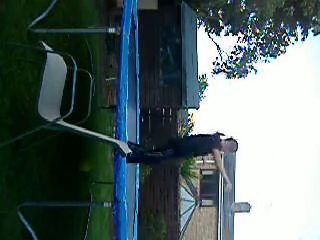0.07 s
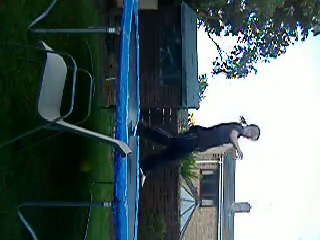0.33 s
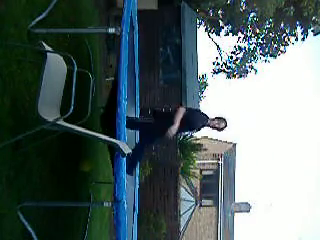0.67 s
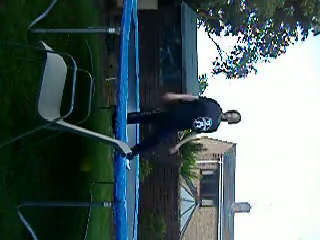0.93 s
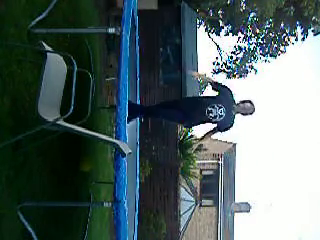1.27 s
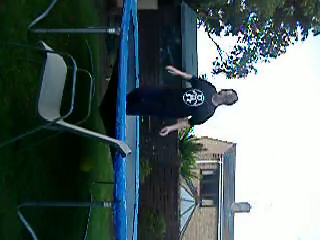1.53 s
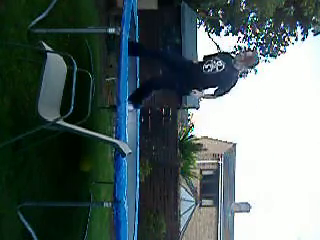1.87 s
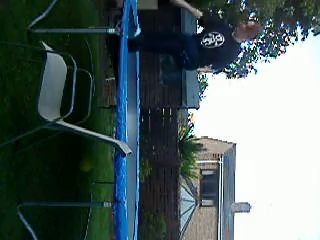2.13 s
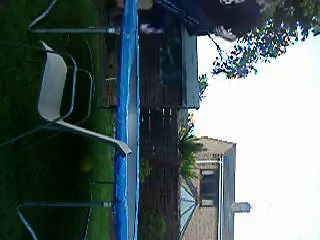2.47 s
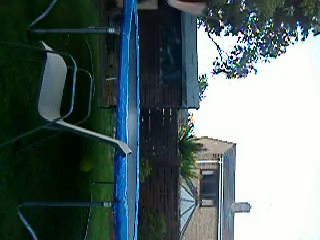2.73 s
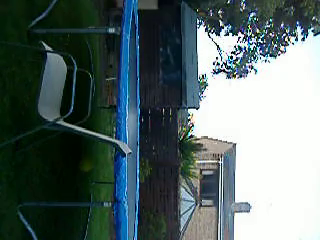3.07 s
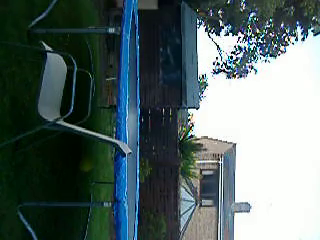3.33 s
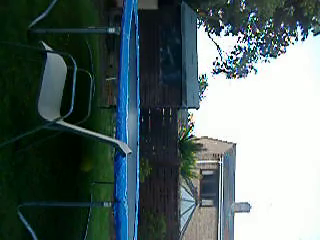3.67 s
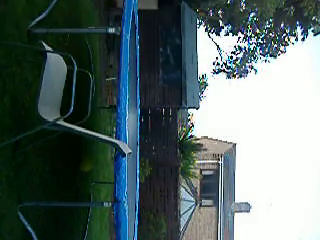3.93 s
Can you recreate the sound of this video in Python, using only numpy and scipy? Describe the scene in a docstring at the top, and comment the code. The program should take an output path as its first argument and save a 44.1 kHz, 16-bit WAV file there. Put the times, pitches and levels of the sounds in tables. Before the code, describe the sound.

Trampoline springs rasp and creak through about six bounces, roughly two a second, with brief metallic squeals. At about 2.7 seconds a foot knocks on the rim, and dull thuds with a light grass swish follow until 3 seconds. One more soft step lands near 3.8 seconds. Faint outdoor rumble, microphone hiss and a thin high whine continue underneath throughout.

```python
"""Someone bounces on a garden trampoline, whose spring hooks rasp on the frame by stick-slip friction.
The slips come faster under load and drive the resonant modes of the steel; at times a spring squeals.
A foot knocks and thuds on the rim, then the jumper drops to the ground and moves off with dull thuds,
each impact exciting damped vibrations. Behind it are an outdoor rumble, a faint hollow tone and hum,
and the hiss and whine of a small camera."""
import sys
import numpy as np
from scipy import signal
from scipy.fft import rfft, irfft
from scipy.io import wavfile
from scipy.ndimage import uniform_filter1d

SR = 44100
rng = np.random.default_rng(int(sys.argv[2]) if len(sys.argv) > 2 else 0)


def dump_mix(stems):
    """Bounce the given channels to the path in sys.argv[1] as a 16-bit WAV at rate SR."""
    frames = np.atleast_2d(stems).T  # one column per channel
    limited = np.clip(frames, -1, 1)  # hard clip at full scale
    pcm = np.round(limited * 32767).astype(np.int16)
    wavfile.write(sys.argv[1], SR, pcm)


N = 176400
T = np.arange(N) / SR
CUTOFF_HZ = 9300


def from_db(db):
    """Amplitude ratio: a factor of ten for every 20 dB."""
    return 10 ** (np.asarray(db) / 20)


def rms_one(x):
    """Normalisation to unit root-mean-square amplitude."""
    return x / np.sqrt(np.mean(x ** 2) + 1e-20)


def drift(corner_hz):
    """Random fluctuation: low-passed noise of unit rms, computed at every 40th sample."""
    pole = np.exp(-80 * np.pi * corner_hz / SR)
    slow = signal.lfilter([1], [1, -2 * pole, pole * pole], rng.standard_normal(N // 40 + 2002))[2000:]
    return np.interp(np.arange(N) / 40, np.arange(len(slow)), rms_one(slow))


def colour(x, points):
    """Spectral shaping by (frequency_hz, gain_db) points, falling 12 dB per octave below the first."""
    hz, db = np.transpose(points)
    bins_hz = np.maximum(np.fft.rfftfreq(2 * N, 1 / SR), 1)
    rolloff_db = 40 * np.log10(np.minimum(bins_hz / hz[0], 1))
    gain = from_db(np.interp(np.log(bins_hz), np.log(hz), db) + rolloff_db)
    return irfft(rfft(x, 2 * N) * gain * (bins_hz < CUTOFF_HZ))[:N]


def resonator(x, hz, t60_s):
    """Damped harmonic oscillator: a unit impulse starts a decaying sine of amplitude 1."""
    decay, step = from_db(-60 / (t60_s * SR)), 2 * np.pi * hz / SR
    return signal.lfilter([0, np.sin(step)], [1, -2 * decay * np.cos(step), decay * decay], x + 1e-18)


def reverberate(x, t60_s):
    """Diffuse decay: convolution with exponentially dying noise of unit energy."""
    echoes = rng.standard_normal(N) * np.exp(-np.log(1000) * T / t60_s)
    return signal.fftconvolve(x, echoes / np.linalg.norm(echoes))[:N]


def impulses(starts_s, sizes):
    """Ideal impacts, each one sample long."""
    return np.bincount((np.asarray(starts_s) * SR).astype(int), sizes, N)[:N]


def narrowband_swells(rows):
    """Narrowband noise: random amplitude and phase roughen each tone as it swells and fades."""
    out = 0
    for start_s, length_s, pitch_hz, level_db, width_hz in rows:
        swell = np.sqrt(np.abs(np.sin(np.pi * np.clip((T - start_s) / length_s, 0, 1))))
        phasor = drift(width_hz / 2) + 1j * drift(width_hz / 2)
        phasor /= np.sqrt(uniform_filter1d(np.abs(phasor) ** 2, size=2000) + 1e-6)
        tone = np.sqrt(2) * np.real(phasor * np.exp(2j * np.pi * pitch_hz * T))
        out += from_db(level_db) * swell * tone
    return out


# Spectrum of the rumble and hiss: frequency_hz, gain_db
AMBIENT_SPECTRUM = [(20, 5.5), (40, 1.5), (80, -0.5), (125, -4), (200, -8.5), (270, -9.5), (390, -11.5),
                    (580, -11.5), (760, -12), (920, -9), (1120, -18.5), (1400, -20), (2000, -22.5),
                    (5400, -24.5), (7500, -22.5), (8400, -29.5)]
def rumble_and_hiss():
    """Broadband noise: outdoor rumble wavers by amplitude modulation under steady camera hiss."""
    noise = from_db(-45.5) * rms_one(colour(rng.standard_normal(N), AMBIENT_SPECTRUM))
    rumble = signal.sosfiltfilt(signal.butter(2, 900, fs=SR, output="sos"), noise)
    hiss = noise - rumble
    return hiss + rumble * from_db(drift(4.1))


# Thin tones of the camera: pitch_hz, level_db
WHINE_TONES = [(7354, -65), (7887, -66), (8113, -69)]
def camera_whine(wander_hz=8):
    """Random frequency modulation makes each high sine waver slightly."""
    out = 0
    for pitch_hz, level_db in WHINE_TONES:
        phase = 2 * np.pi * np.cumsum(pitch_hz + wander_hz * drift(25)) / SR
        out += from_db(level_db) * np.sqrt(2) * np.sin(phase)
    return out


# Hollow tone and low hum: start_s, length_s, pitch_hz, level_db, width_hz
HOLLOW_SWELLS = [(1.06, 0.12, 538, -53, 13), (1.33, 0.14, 550, -57, 20), (1.6, 0.34, 521, -54.5, 25)]
HUM_SWELLS = [(3.58, 0.49, 235, -54.5, 26)]
def hollow_tone_and_hum():
    """Noise in a narrow band is heard as a pitch: a hollow tone comes and goes, a hum swells once."""
    return narrowband_swells(HOLLOW_SWELLS) + narrowband_swells(HUM_SWELLS)


# Strokes of a sole over the grass: start_s, length_s, level_db
SOLE_STROKES = [(2.835, .035, -46), (2.885, .05, -48), (3.781, .016, -42)]
# Spectrum of the swish: frequency_hz, gain_db
GRASS_SPECTRUM = [(250, 5.5), (850, -1), (1300, -13.5), (2300, -10), (3500, -22), (8000, -30)]
def grass_swishes():
    """Sliding friction of a sole makes short, dry swells of noise."""
    envelope = sum(from_db(level_db) * np.sin(np.pi * np.clip((T - start_s) / length_s, 0, 1))
                   for start_s, length_s, level_db in SOLE_STROKES)
    return envelope * rms_one(colour(rng.standard_normal(N), GRASS_SPECTRUM))


# Dull thuds of the feet, first on the rim, then on the ground: start_s, level_db, contact_s
FOOT_THUDS = [(2.655, -31, 0.0013), (2.827, -31.5, 0.0024), (2.843, -33, 0.00404), (2.857, -26.5, 0.0051),
              (2.897, -29, 0.0064), (2.946, -34.5, 0.0039), (2.999, -40.5, 0.0061), (3.775, -33, 0.0018),
              (3.788, -32, 0.0012), (3.804, -41, 0.0046)]
# Low resonances that boom under the feet: pitch_hz, gain_db, t60_s
BOOM_MODES = [(49, -14, 0.15), (75.1, -12, 0.15), (117.2, -5, 0.21), (173, -6.5, 0.12), (240, -16.5, 0.053),
              (373, -19.5, 0.042)]
# Spectrum of the scuff: frequency_hz, gain_db
SCUFF_SPECTRUM = [(60, -0.5), (200, 1.5), (400, -6), (800, -9), (1300, -26), (2300, -19.5), (4000, -44),
                  (8000, -42)]
def foot_thuds():
    """Soft impacts give a pressure swing, a boom and a scuff; longer contact makes a duller boom."""
    force, pressure = 0, 0
    for start_s, level_db, contact_s in FOOT_THUDS:
        push = np.sin(np.pi * np.clip((T - start_s) / contact_s, 0, 1)) ** 2
        force += from_db(level_db) * push / push.sum()
        cycle = np.clip((T - start_s + contact_s) / (2 * contact_s), 0, 1)
        pressure -= from_db(level_db) * np.sin(2 * np.pi * cycle)
    boom = sum(from_db(db + 0.5) * resonator(force, hz, t60_s) for hz, db, t60_s in BOOM_MODES)
    starts_s, levels_db, _ = np.transpose(FOOT_THUDS)
    blows = impulses(starts_s, from_db(levels_db))
    scuff = colour(reverberate(blows, t60_s=0.16), SCUFF_SPECTRUM)
    return from_db(-2.5) * pressure + boom + from_db(36) * scuff


# Blows of a foot on the rim: start_s, level_db
RIM_BLOWS = [(0.002, -22), (2.651, -33.5), (2.658, -26), (2.662, -30.5), (2.670, -31), (2.684, -30.5)]
# Resonances of the rim: pitch_hz, gain_db, t60_s
RIM_MODES = [(162, -10, 0.043), (280, -14.5, 0.086), (458, -14.5, 0.17), (632, -24, 0.096),
             (840, -13, 0.087), (1820, -24, 0.14), (1970, -13, .1), (2896, -18, 0.11), (4050, -14, 0.14)]
# Spectrum of the slap: frequency_hz, gain_db
SLAP_SPECTRUM = [(110, 2), (300, 2), (850, -3.5), (1350, -11), (2200, -10.5), (8000, -22.5)]
def rim_knocks():
    """Impulse excitation: the padded rim answers a foot with a dense slap and a short hollow ring."""
    starts_s, levels_db = np.transpose(RIM_BLOWS)
    blows = impulses(starts_s, from_db(levels_db))
    slap = from_db(29.5) * colour(reverberate(blows, t60_s=0.046), SLAP_SPECTRUM)
    ring = sum((-1) ** k * from_db(db) * resonator(blows, hz, t60_s)
               for k, (hz, db, t60_s) in enumerate(RIM_MODES))
    return slap + ring


# Squeals of single springs: start_s, length_s, pitch_hz, level_db, width_hz
SPRING_SQUEALS = [(0.0, 0.027, 5200, -33.5, 138.9), (.14, 0.2, 3370, -42, 403),
                  (.625, 0.15, 2646, -44.5, 185.2), (.645, .045, 6400, -33, 300),
                  (1.438, 0.11, 1897, -41.5, 25), (1.57, 0.038, 1880, -37, 60), (1.71, .14, 1870, -61, 30),
                  (1.862, .05, 2355, -45, 25.4), (2.435, 0.099, 2367, -35, 129.6)]
def spring_squeals():
    """Resonance: a spring briefly sounds in a narrow band around its own natural frequency."""
    return narrowband_swells(SPRING_SQUEALS)


FULL_LOAD_DB = -26.5   # the bounce level that stands for full load
def hook_slips(level_db, hooks=6, slips_per_s=170, jitter=0.1, spread_db=2.5, swing_db=2):
    """Stick-slip motion: each hook emits an uneven impulse train, faster under load; rms near 1."""
    out = np.zeros(N)
    speed = from_db(0.3 * (level_db - FULL_LOAD_DB))
    for pace in np.geomspace(0.5, 2, hooks):
        rate = slips_per_s * pace * speed * np.exp(jitter * (drift(5) + drift(150)))
        slips_so_far = np.floor(np.cumsum(rate) / SR + rng.random())
        slipped = np.diff(slips_so_far, prepend=0) > 0
        size_db = spread_db * np.clip(rng.standard_normal(N), -2, 2) + swing_db * drift(21)
        out += slipped * from_db(size_db) * rng.choice([-1, 1])
    out -= uniform_filter1d(out, size=441)   # remove the local mean
    return out / np.sqrt(uniform_filter1d(out ** 2, size=1500) + 1e-6)


# Spectrum of the rubbing hooks and mat: frequency_hz, gain_db
FRICTION_SPECTRUM = [(130, -16.5), (220, -15.5), (360, -13.5), (500, -5.5), (950, -5.5), (1300, -5),
                     (1800, -3), (2500, 0.5), (2850, -1.5), (3100, -2), (3400, 0.5), (4100, 0.5), (4700, 0),
                     (5200, 0), (5750, -2.5), (6400, 0), (7600, -0.5), (8400, -8)]
def friction(level_db, mat_db=2.5):
    """Friction noise of unit rms: discrete slips of the hooks over the smooth rubbing of the mat."""
    rubbing = hook_slips(level_db) + from_db(mat_db) * rng.standard_normal(N)
    return rms_one(colour(rubbing, FRICTION_SPECTRUM))


# Hooks catching as the load comes on: start_s, level_db
HOOK_CATCHES = [(0.389, -31), (0.601, -35), (0.623, -25), (0.819, -26), (0.905, -35), (1.012, -39),
                (1.256, -32), (1.436, -36), (1.466, -32), (1.488, -23.5), (1.635, -29), (1.863, -35),
                (2.116, -24), (2.247, -41), (2.437, -25)]
def hook_catches(t60_s=0.048):
    """Friction transients: bright bursts of slips start abruptly and decay exponentially."""
    envelope = sum(from_db(db) * (T >= start_s) * np.exp(-np.log(1000) * np.abs(T - start_s) / t60_s)
                   for start_s, db in HOOK_CATCHES)
    burst = envelope * friction(np.full(N, FULL_LOAD_DB))
    return signal.sosfilt(signal.butter(2, 2000, "high", fs=SR, output="sos"), burst)


# Resonances of the springs and frame: pitch_hz, level_db, t60_s
STEEL_MODES = [(826, -29, .12), (930, -27, .08), (1238, -27, .18), (1722, -22, .14), (1888, -20, .08),
               (2357, -22, .08), (2623, -25, .14), (2843, -23, .08), (3355, -23, .1), (3608, -25, .1),
               (3923, -23, .08), (4265, -24, .05), (5285, -24, .06), (6139, -27, .1)]
def steel_ring(level_db):
    """Forced vibration: friction drives the modes, which take turns as load shifts among the springs."""
    drive = friction(level_db) * from_db(level_db)
    modes = sum(from_db(db) * rms_one(resonator(drive, hz, t60_s) * from_db(drift(8.6)))
                for hz, db, t60_s in STEEL_MODES)
    slack = np.clip((FULL_LOAD_DB - level_db) / 10, 0, 2)
    return modes * from_db(1.5 * slack)   # up to 3 dB more gain in the quiet between bounces


# Course of the rasp and its low and high bands in each bounce: time_s, level_db, groan_db, treble_db
RASP_1 = [(0.0, -21.5, -9.5, 0.5), (0.01, -21, -15, -3), (0.062, -30, -7, -3.5), (0.112, -27, -15.5, -4.5),
          (0.312, -27, -12.5, -4), (0.338, -32.5, -12, -7), (0.394, -30, -11.5, -5), (0.506, -41, -11, -8),
          (0.59, -55, -20.5, -14)]
RASP_2 = [(0.59, -53, -14, -4.5), (0.6, -45, -2.5, -5.5), (0.634, -26, -21.5, -1), (0.648, -24, -14.5, -4),
          (0.806, -27, -6.5, -3.5), (0.816, -25, -13.5, -7.5), (0.88, -34, -11, -4), (0.912, -32, -9, -4),
          (1.0, -48, -7.5, -6.5)]
RASP_3 = [(1.0, -45, 2.5, -11.5), (1.048, -32, -12.5, -6), (1.175, -35, -22, -3.5), (1.21, -31, -11, -4.5),
          (1.256, -32, -20.5, -6.5), (1.318, -46, -8.5, -4), (1.408, -54, 1.5, -10)]
RASP_4 = [(1.428, -58, 1, -11.5), (1.436, -42, -20, -6), (1.476, -29, -7, -4.5), (1.488, -27, -17, -6),
          (1.56, -28, -13.5, -5), (1.584, -26, -13.5, -4.5), (1.622, -36, -9, -8), (1.645, -32, -17, -7.5),
          (1.796, -54, 0.5, -8.5)]
RASP_5 = [(1.82, -51, -4, -11), (1.844, -47, 2.5, -8.5), (1.867, -33, -12.5, -3), (1.954, -34, -13.5, -6),
          (1.966, -28.5, -8, -3.5), (1.99, -27.5, -19, -5.5), (2.024, -30.5, -9, -3.5),
          (2.13, -26, -13, -4.5), (2.144, -33.5, -8, -9.5), (2.166, -27.5, -6.5, -2.5),
          (2.242, -40, -11.5, -5.5), (2.246, -35, -13, -5), (2.306, -43, -2, -5.5), (2.33, -34, -7.5, -5),
          (2.366, -39, -6.5, -11.5)]
RASP_6 = [(2.39, -40.5, -4, -7.5), (2.43, -33.5, -2.5, -3.5), (2.44, -26, -11.5, -5.5),
          (2.486, -26, -14.5, -5), (2.572, -41, -8.5, -10.5), (2.59, -39, -8.5, -1),
          (2.644, -48.5, 2.5, -10), (2.662, -35.5, -10, -12.5), (2.73, -48, -4.5, -15), (2.8, -57, 4.5, -3)]
def spring_rasp(release_db_per_s=88, surge_db=0.81, neutral_groan_db=-12.5, neutral_treble_db=-3):
    """Stick-slip friction rasps with each bounce, shifting in level and timbre as the steel rings."""
    times_s, *columns = np.transpose(np.vstack([RASP_1, RASP_2, RASP_3, RASP_4, RASP_5, RASP_6]))
    level_db, groan_db, treble_db = (np.interp(T, times_s, column) for column in columns)
    level_db -= release_db_per_s * np.maximum(T - times_s[-1], 0)
    grit = friction(level_db)
    low, low_and_mid = (signal.sosfiltfilt(signal.butter(3, edge_hz, fs=SR, output="sos"), grit)
                        for edge_hz in (1300, 4800))
    groan = low * from_db(groan_db - neutral_groan_db)
    mid = low_and_mid - low
    treble = (grit - low_and_mid) * from_db(treble_db - neutral_treble_db)
    rasp = (groan + mid + treble) * from_db(level_db + 0.19 + surge_db * drift(63))
    return rasp + from_db(2.1) * np.std(rasp) * steel_ring(level_db)


def scene():
    """Superposition of the trampoline, its faint echoes in the yard, the feet and the background."""
    trampoline = spring_rasp() + hook_catches() + spring_squeals() + rim_knocks()
    background = rumble_and_hiss() + camera_whine() + hollow_tone_and_hum()
    yard_echoes = from_db(-14) * reverberate(trampoline, t60_s=0.1)
    return (trampoline + yard_echoes + foot_thuds() + grass_swishes() + background)[None]


def record(dry):
    """Band limiting: the camera rolls off the treble, then cuts it steeply."""
    softened = signal.sosfilt(signal.butter(12, 8300, fs=SR, output="sos"), dry)
    return signal.sosfilt(signal.cheby2(16, 60, CUTOFF_HZ, fs=SR, output="sos"), softened)


dry = scene()
out = record(dry)
dump_mix(out)
```